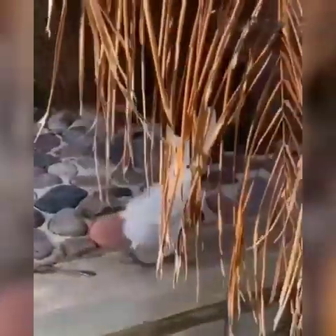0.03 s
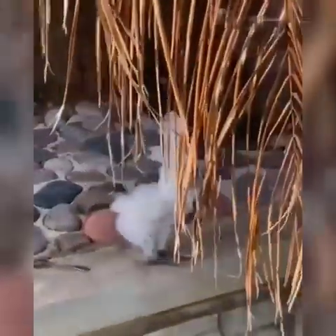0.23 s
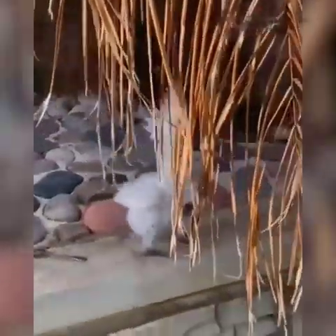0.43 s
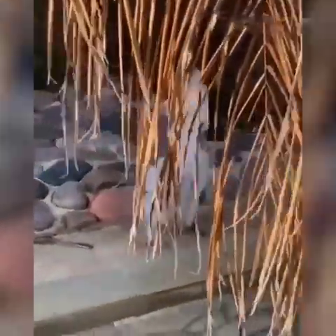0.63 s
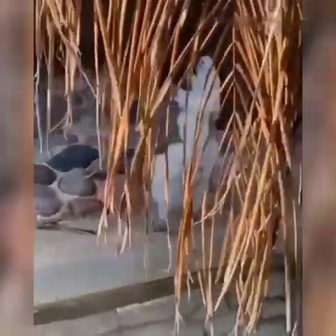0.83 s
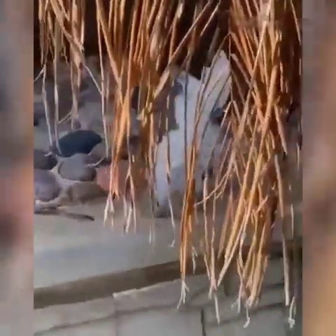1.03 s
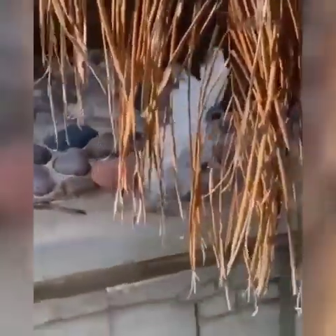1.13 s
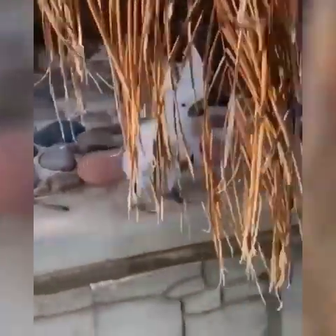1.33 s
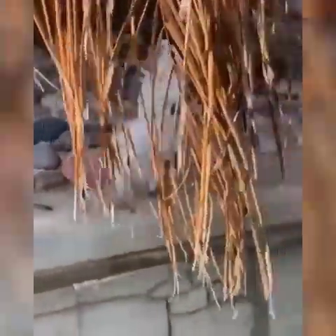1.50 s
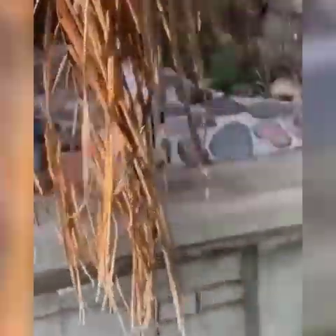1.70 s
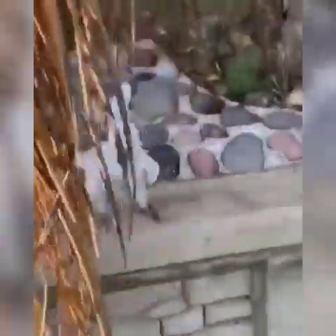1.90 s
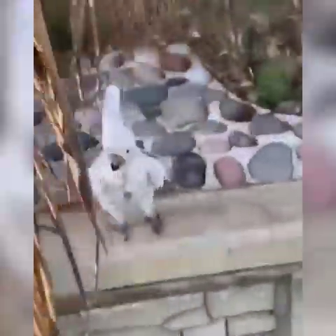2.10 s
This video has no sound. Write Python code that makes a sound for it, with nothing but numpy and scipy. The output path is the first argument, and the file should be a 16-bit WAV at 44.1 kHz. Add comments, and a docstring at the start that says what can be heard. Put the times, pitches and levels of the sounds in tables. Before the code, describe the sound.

In a garden, a cockatoo imitates a dog with four short, rough barks in a row and a fifth after a pause. Soft thuds touch the microphone, while light hiss and low rumble continue underneath.

```python
"""A cockatoo barks like a dog in a garden. Outdoor hiss and rumble run throughout, and a faint drone fades
from the start. From 0.2 to 1 s come four barks, each an arched tone over a rasp of slower, uneven pulses
that rings in the throat and echoes off the garden walls. Low bumps on the microphone and a small tick
set in during the first bark; the bumps go on through the pause. A fifth bark at 1.75 s, then a last tick.
All along, the stereo image is centred below about 1.6 kHz, the left channel leading in the treble."""
import sys
import numpy as np
from scipy import signal
from scipy.fft import rfft, irfft, next_fast_len
from scipy.io import wavfile
from scipy.ndimage import map_coordinates

SR = 44100
rng = np.random.default_rng(int(sys.argv[2]) if len(sys.argv) > 2 else 0)


def int16_out(signal):
    """Quantize to a 16-bit WAV file."""
    q = np.round(np.clip(np.atleast_2d(signal).T, -1, 1) * 32767)
    wavfile.write(sys.argv[1], SR, q.astype(np.int16))


N = 94815
TIME = np.arange(N) / SR


def amp(db):
    return 10 ** (np.asarray(db) / 20)


def unit(x):
    return x / np.sqrt(np.mean(x ** 2) + 1e-20)


def along(points, hz):
    """Read a curve of (f/Hz, value) points on a log frequency axis."""
    f, v = np.transpose(points)
    return np.interp(np.log(hz + 1), np.log(f + 1), v)


def wobble(rate):
    """Smooth random modulation, rate knots a second."""
    return map_coordinates(rng.standard_normal(int(N * rate / SR) + 4), [TIME * rate])


def filtered(x, response):
    """EQ x with a complex frequency response."""
    size = next_fast_len(N + SR // 2)
    return irfft(rfft(x, size) * response(np.fft.rfftfreq(size, 1 / SR)), size)[..., :N]


def ring(x, peaks):
    """Ring x through steep resonators (f/Hz, width/Hz, level/dB); rms 1."""
    bandpass = lambda f, c, w: 1j * f * w / (c * c - f * f + 1j * f * w)
    return unit(filtered(x, lambda f: sum(amp(db) * bandpass(f, c, w) ** 2 for c, w, db in peaks)))


# How alike left and right are in the noise beds: f/Hz, correlation
BED_CORRELATION = [(40, 0.97), (200, 0.99), (1500, 0.75), (3000, 0.84), (6000, 1), (11000, 0.66)]
def noise_bed(spectrum):
    """Mid/side noise of rms 1, mostly shared by both channels."""
    def shape(hz):
        spread = np.arccos(along(BED_CORRELATION, hz)) / 2
        return amp(along(spectrum, hz)) * [np.cos(spread), np.sin(spread)]
    mid, side = filtered(rng.standard_normal((2, N)), shape)
    return unit(np.array([mid + side, mid - side]))


# Hiss colour: f/Hz, relative level/dB
HISS_EQ = [(150, -35), (300, -5.5), (500, -1.5), (1000, -3.5), (2500, -7.5), (5000, -8.5), (8000, -10.5),
           (11300, -11.5), (12000, -20)]
# Hiss fader: t/s, level/dB
HISS_FADER = [(0, -54), (.18, -58.5), (.4, -52), (.62, -55.5), (.83, -56), (1.05, -53.5), (1.45, -53),
              (1.75, -50.5), (2.15, -50.5)]
def hiss():
    """Broad outdoor hiss, gently swaying in level."""
    level_db = np.interp(TIME, *np.transpose(HISS_FADER)) - 0.7 * wobble(9.44)
    return amp(level_db) * noise_bed(HISS_EQ)


# Rumble colour: f/Hz, relative level/dB
RUMBLE_EQ = [(18, 0.5), (30, -0.5), (50, -2), (110, -4), (160, -9.5), (250, -8), (400, -16.5), (700, -44.5)]
# Rumble fader: t/s, level/dB
RUMBLE_FADER = [(0.0, -47.5), (0.14, -48.5), (0.51, -45.5), (0.69, -49), (0.95, -47), (1.05, -49.5),
                (1.47, -49.5), (1.63, -46.5), (2.15, -48.5)]
def rumble():
    """Low outdoor rumble with lumps of about 1 dB."""
    level_db = np.interp(TIME, *np.transpose(RUMBLE_FADER)) + wobble(9.84)
    return amp(level_db) * noise_bed(RUMBLE_EQ)


# Drone resonances: f/Hz, width/Hz, relative level/dB
DRONE_PEAKS = [(477, 600, -5.5), (809, 76, 0.5), (1128, 36, 7), (1260, 44, -6), (1628, 27, -2),
               (3045, 74, -4), (3240, 1500, -11.5)]
def drone(start_db=-42, t60_s=3.06):
    """Faint resonant noise, fluttering as it dies away."""
    level_db = start_db - 60 * TIME / t60_s + 1.4 * wobble(37.4)
    return amp(level_db) * ring(rng.standard_normal(N), DRONE_PEAKS)


def rasp(rate_hz, drift=.01, jitter_cycles=.022, shimmer_db=2):
    """The rasp's drive: uneven pulses, breath noise puffing once a cycle, and the cycle count."""
    cycles = np.cumsum(rate_hz * (1 + drift * wobble(25))) / SR
    onsets = np.flatnonzero(np.diff(np.floor(cycles)))
    timing, size = rng.standard_normal((N // 40, 2))[:len(onsets)].T
    onsets += np.round(timing * jitter_cycles * SR / rate_hz[onsets]).astype(int)
    pulses = np.bincount(np.clip(onsets, 0, N - 1), amp(shimmer_db * size), N)
    breath = rng.standard_normal(N) * np.exp(-1.3 * (cycles % 1))
    return unit(pulses - pulses.mean()), unit(breath), cycles


def bark_tone(pitch_hz, rasp_cycles, wander=.03, octave_db=-24, beat_depth=.22):
    """A wavering tone with a faint octave, roughened by beating at the rasp's rate."""
    phase = 2 * np.pi * np.cumsum(pitch_hz * (1 + wander * wobble(200))) / SR
    tone = np.sqrt(2) * (np.sin(phase) + amp(octave_db) * np.sin(2 * phase))
    return tone * (1 + beat_depth * np.cos(2 * np.pi * rasp_cycles))


# Throat resonances for body, upper band and top sheen: f/Hz, width/Hz, relative level/dB
BODY_PEAKS = [(466, 360, -3), (821, 167, -4.5), (1038, 79, 0), (1293, 153, -4.5)]
UPPER_PEAKS = [(1592, 134, 7.5), (1767, 89, 9), (2013, 87, 9.5), (2373, 91, 2.5), (2960, 560, -7.5)]
SHEEN_PEAKS = [(8330, 400, -38.5), (10400, 3500, -12)]
def throat(trims_db, bite):
    """The throat's three resonator banks, voiced for one bark: body, upper and treble."""
    low_db, middle_db, upper_db, sheen_db = trims_db
    bite_hz, below_db, above_db = bite
    body = [(f, w, db + trim) for (f, w, db), trim in zip(BODY_PEAKS, (low_db, 0, middle_db, 0))]
    upper = [(f, w, db + upper_db) for f, w, db in UPPER_PEAKS[:2]] + UPPER_PEAKS[2:]
    treble = [(4100, 800, below_db), (bite_hz, 660, 0), (7270, 800, above_db)]
    sheen = [(f, w, db + sheen_db) for f, w, db in SHEEN_PEAKS]
    return body, upper, treble + sheen


# Automation, one list per bark: t/s, tone f/Hz, tone level/dB, strongest rasp overtone f/Hz,
# body level/dB, upper level/dB, treble level/dB before its lift
BARK_CURVES = [
    [(0.18, 537.8, -37.5, 1264, -45, -51, -72), (0.2, 711.7, -26.5, 1264, -41, -46, -55.5),
     (0.218, 878.4, -24, 1332, -27, -31, -49), (0.228, 857, -23.5, 1253, -19.5, -26.5, -43),
     (0.252, 847.4, -22.5, 1321, -15.5, -28, -44.5), (0.268, 767, -15.5, 1276, -24.5, -32, -43.5),
     (0.282, 784, -26, 1267, -15.5, -43.5, -45.5), (0.312, 814, -30, 1366, -28, -31.5, -48),
     (0.334, 769, -29.5, 1286, -29.5, -61, -51), (0.36, 550, -35, 1286, -32, -48, -57),
     (0.375, 484, -40, 1338, -68, -56, -60)],
    [(0.41, 536.7, -40.5, 1318, -48, -58, -68), (0.434, 584, -29, 1360, -33, -55, -54.5),
     (0.454, 792.5, -25.5, 1325, -31, -36, -46.5), (0.472, 779.3, -30, 1284, -23, -39, -49),
     (0.482, 769, -21, 1348, -27, -31.5, -45), (0.51, 790.5, -23, 1310, -26, -35, -48.5),
     (0.532, 872, -22.5, 1301, -28.5, -37.5, -47), (0.54, 815, -22.5, 1323, -24.5, -50, -52),
     (0.56, 664, -28, 1396, -27, -43.5, -55), (0.576, 584, -30.5, 1314, -37.5, -59, -61),
     (0.6, 586, -49, 1270, -46.5, -78, -75)],
    [(0.63, 466.2, -45.5, 1251, -42.5, -68, -89), (0.66, 592.4, -27.5, 1233, -44.5, -48, -65),
     (0.678, 717, -31, 1305, -29, -43.5, -61), (0.69, 819, -26.5, 1343, -42, -42.5, -57.5),
     (0.708, 819, -29.5, 1322, -24.5, -38.5, -57.5), (0.718, 848, -62, 1446, -23.5, -46, -55),
     (0.73, 894, -39, 1370, -23, -56, -54.5), (0.75, 755, -28.5, 1352, -30.5, -52, -60),
     (0.762, 675, -33, 1432, -27, -51, -64), (0.772, 520, -28.5, 1175, -35, -56, -70),
     (0.79, 460, -65, 1248, -43.5, -73, -88)],
    [(0.865, 509.5, -47, 1292, -53, -60, -81), (0.889, 563, -32, 1374, -39, -48.5, -62),
     (0.903, 704, -31, 1374, -47, -39.5, -58), (0.911, 791, -27, 1401, -38.5, -41.5, -61),
     (0.925, 782, -27, 1265, -25, -37.5, -57), (0.937, 793, -26.5, 1312, -31, -40, -52.5),
     (0.947, 807, -47, 1406, -32.5, -45, -59), (0.957, 872, -24, 1386, -26, -44, -59),
     (0.963, 763, -36, 1332, -40.5, -47, -62), (0.977, 530, -26, 1318, -33, -49, -63),
     (1.0, 467, -55, 1278, -46, -67, -72)],
    [(1.745, 532.5, -49, 1412, -48.5, -60, -68), (1.759, 610.4, -29.5, 1410, -45, -50, -63),
     (1.769, 657, -48, 1378, -42, -48, -57.5), (1.787, 727.4, -24.5, 1354, -32.5, -36, -54),
     (1.807, 778.7, -55, 1337, -16.5, -32.5, -49.5), (1.821, 824, -19.5, 1313, -25, -29.5, -40),
     (1.853, 811, -34, 1311, -20, -27.5, -49), (1.865, 811, -75, 1281, -22, -59, -42.5),
     (1.883, 794, -26.5, 1295, -38.5, -36, -53), (1.899, 830, -35.5, 1335, -56, -68, -66),
     (1.91, 770, -46, 1320, -71, -55, -63)],
]
# Voicing per bark: that overtone's number, then trims: low body/dB, middle body/dB,
# first two upper peaks/dB, sheen/dB
BARK_VOICING = [(6, -18.5, -3.5, -4, -4), (5, -9.5, -3, -5.5, -11), (3, -9, 3.5, -1.5, -4.5),
                (5, -6.5, -3.5, -2, -6), (5, -36, -15, 6.5, -13)]
# Treble bite per bark: resonance f/Hz, relative level/dB of the peak below, of the peak above
BARK_BITE = [(5870, 1.5, -8), (5494, -11.5, -20), (5780, -3.5, -8), (5580, -5, -9.5), (5660, -8.5, -19)]
def cockatoo(edge_s=.013, flutter_db=2, treble_lift_db=9.5, low_cut_hz=380):
    """Five barks: each a rough tone on a pitch arch, over a rasp ringing in the throat."""
    barks = np.zeros(N)
    for curves, (overtone, *trims_db), bite in zip(BARK_CURVES, BARK_VOICING, BARK_BITE):
        times, *lanes = np.transpose(curves)
        pitch_hz, tone_db, overtone_hz, body_db, upper_db, treble_db = (
            np.interp(TIME, times, lane) for lane in lanes)
        fade_in = np.clip((TIME - times[0]) / edge_s + 1, 0, 1)
        fade_out = np.clip((times[-1] - TIME) / edge_s + 1, 0, 1)
        pulses, breath, cycles = rasp(overtone_hz / overtone)
        buzzy, breathy = (np.sqrt(1 - share) * pulses + np.sqrt(share) * breath for share in (.08, .75))
        body, upper, treble = throat(trims_db, bite)
        voice = bark_tone(pitch_hz, cycles) * amp(tone_db + flutter_db * wobble(180))
        voice += amp(body_db) * ring(buzzy, body)
        voice += amp(upper_db) * ring(buzzy, upper)
        voice += amp(treble_db + treble_lift_db) * ring(breathy, treble)
        barks += fade_in * fade_out * voice
    return filtered(barks, lambda f: (1j * f / (low_cut_hz + 1j * f)) ** 2)


# Decay of the wall echo: f/Hz, t60/s
WALL_DECAY = [(300, .16), (1500, .16), (8000, .12)]
def garden_walls(x, predelay_samples=200):
    """A short, diffuse stereo echo whose treble dies first."""
    hz, t, noise = signal.stft(rng.standard_normal((2, SR // 2)), SR, nperseg=256)
    decay = amp(-60 * t / along(WALL_DECAY, hz)[:, None])
    tail = signal.istft(noise * decay, SR, nperseg=256)[1]
    delayed = np.pad(x, (predelay_samples, 0))[None]
    return signal.fftconvolve(delayed, tail / np.linalg.norm(tail[0]), axes=1)[:, :N]


# Bump cues: t/s, envelope peak level/dB, f/Hz
BUMP_CUES = [(0.221, -36, 53.6), (0.567, -34.5, 59.4), (0.622, -31.5, 54.45), (0.89, -34, 51.7),
             (1.11, -27.5, 58), (1.229, -39.5, 55), (1.65, -40, 57.7)]
def microphone_bumps(rise_s=.0072, early_s=.01):
    """Soft low thuds on the microphone, a couple of cycles each."""
    thuds = np.zeros(N)
    for cue_s, db, hz in BUMP_CUES:
        age = np.clip(TIME - cue_s + early_s, 0, None)
        envelope = age / rise_s * np.exp(1 - age / rise_s)
        thuds += amp(db) * envelope * np.sin(2 * np.pi * hz * age)
    return thuds


# Tick cues: t/s, level/dB before the EQ, low cut f/Hz, high cut f/Hz, Gaussian width/s
TICK_CUES = [(0.368, -26, 4470, 10900, 0.0021), (1.942, -22, 577, 2430, 0.0022)]
def ticks():
    """Two tiny bursts of noise, the first bright, the second duller."""
    bursts = np.zeros(N)
    for cue_s, db, low, high, width_s in TICK_CUES:
        envelope = np.exp(-.5 * ((TIME - cue_s) / width_s) ** 2)
        band = lambda f: (f / low) ** 2 / (1 + (f / low) ** 2) / (1 + f / high)
        bursts += amp(db) * envelope * filtered(rng.standard_normal(N), band)
    return bursts


def scene(echo_db=-17):
    """The mix: direct sounds a touch to the right, the bird's echo and the beds around them."""
    bird = cockatoo()
    direct = bird + drone() + microphone_bumps() + ticks()
    pan = amp([[-.4], [.4]])
    return direct * pan + amp(echo_db) * garden_walls(bird) + hiss() + rumble()


def gain_control(x, threshold_db=-27, db_per_db=.099, response_s=.49, start_db=-21.5):
    """A slow, gentle compressor: still recovering at the start, it ducks after loud barks."""
    pole = np.exp(-1 / (response_s * SR))
    power = signal.lfilter([1 - pole], [1, -pole], np.mean(x ** 2, axis=0), zi=[amp(start_db) ** 2])[0]
    over_db = np.clip(10 * np.log10(power + 1e-12) - threshold_db, 0, None)
    return x * amp(-db_per_db * over_db)


# How far the left channel leads the right: f/Hz, phase/rad
LEFT_LEAD = [(2200, 1.45), (3600, 1.37), (4200, 3.73), (5300, 2.72), (5800, 5.43), (9800, 6.88),
             (11500, 8.5)]
def record(dry):
    """Stereo image centred below about 1.6 kHz, left leading in the treble; gain control; high cut."""
    centred_below_hz, top_hz = 1620, 11970
    lead = [(centred_below_hz, 0.)] + LEFT_LEAD
    widened = filtered(dry, lambda hz: np.exp(.5j * along(lead, hz) * np.array([[1], [-1]])))
    return filtered(gain_control(widened), lambda hz: hz < top_hz)


dry = scene()
out = record(dry)
int16_out(out)
```